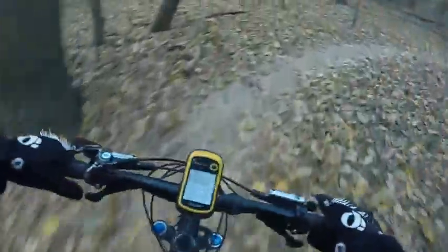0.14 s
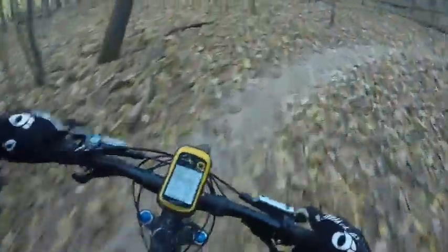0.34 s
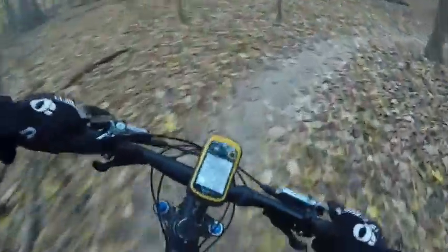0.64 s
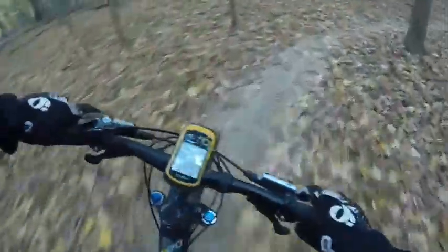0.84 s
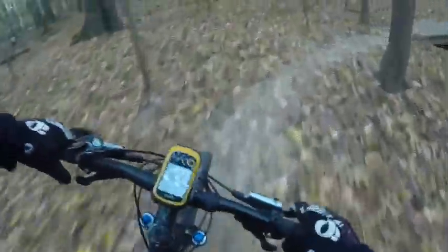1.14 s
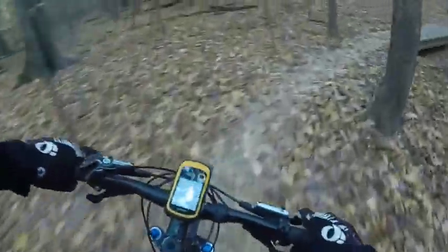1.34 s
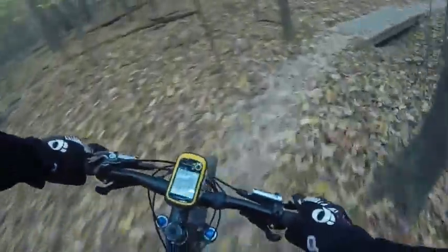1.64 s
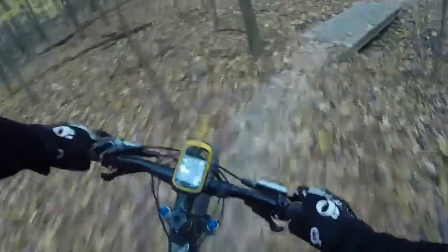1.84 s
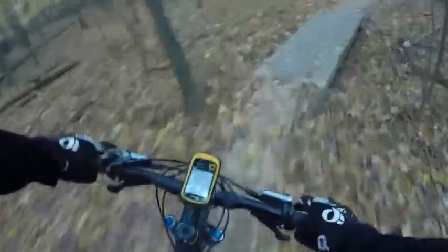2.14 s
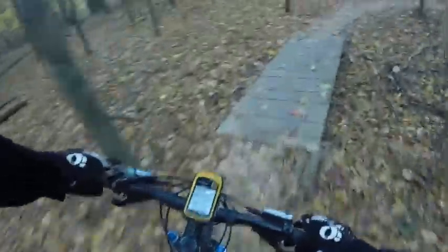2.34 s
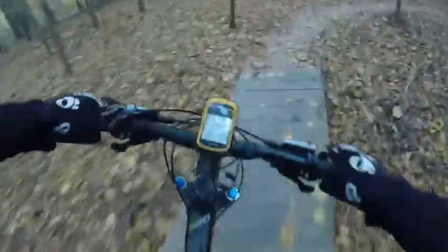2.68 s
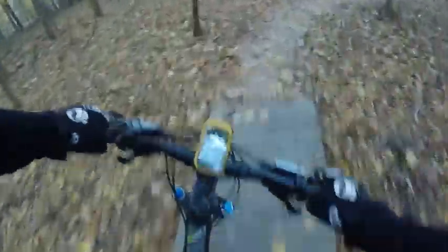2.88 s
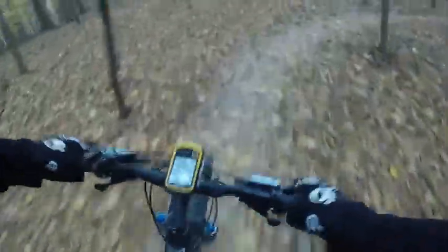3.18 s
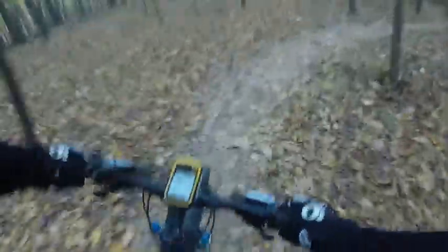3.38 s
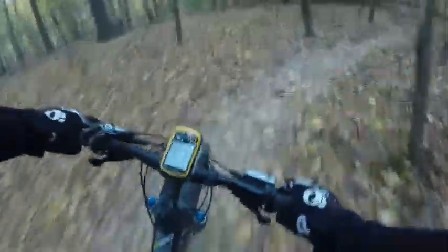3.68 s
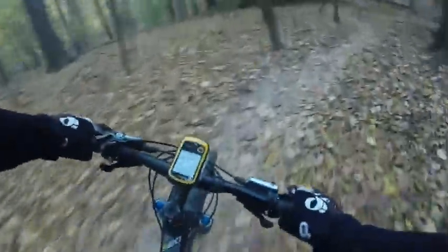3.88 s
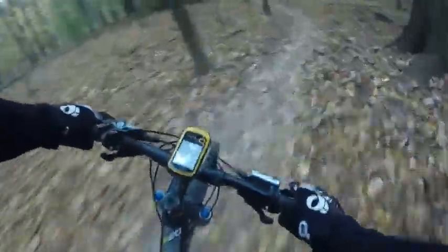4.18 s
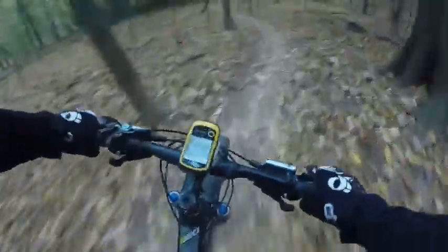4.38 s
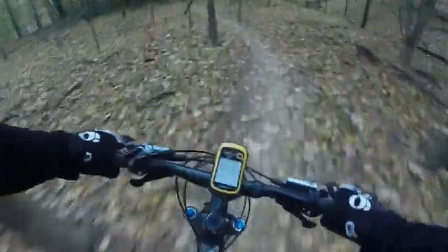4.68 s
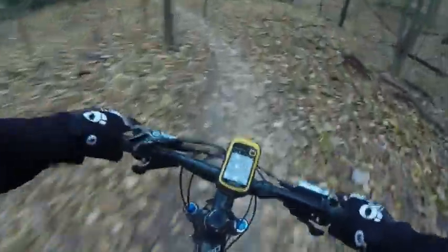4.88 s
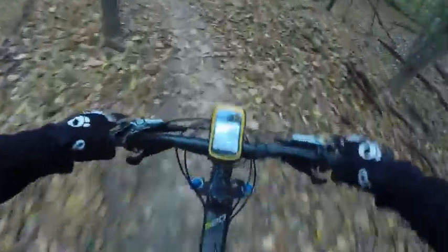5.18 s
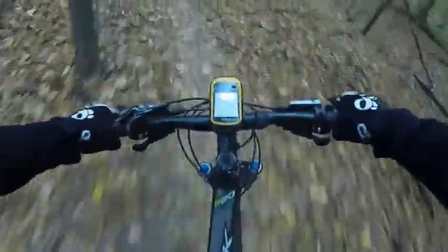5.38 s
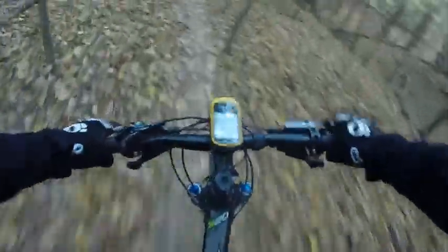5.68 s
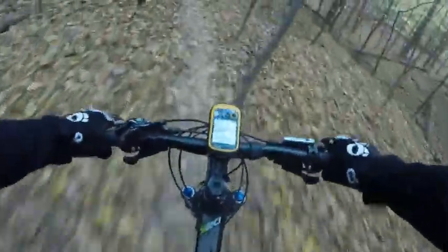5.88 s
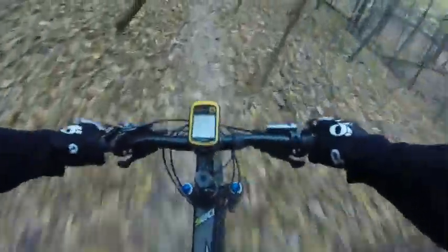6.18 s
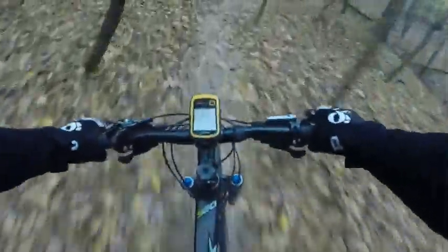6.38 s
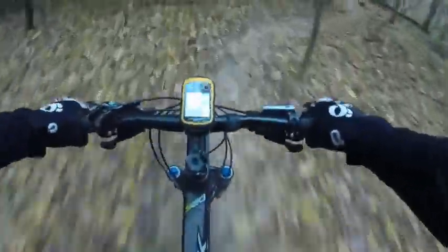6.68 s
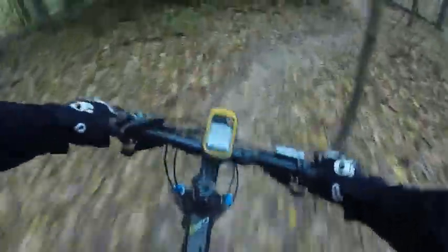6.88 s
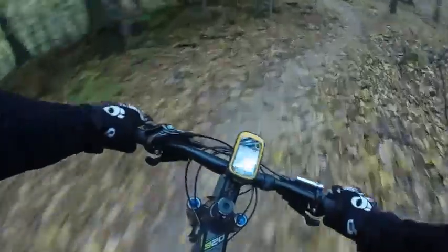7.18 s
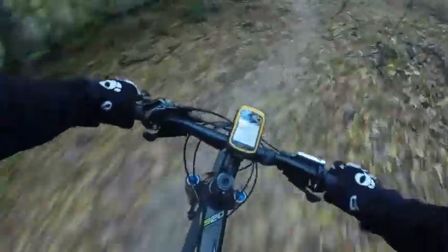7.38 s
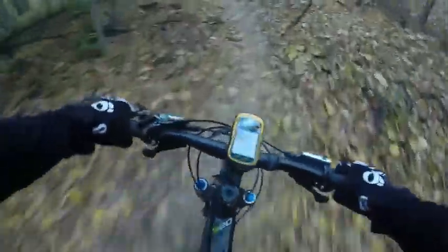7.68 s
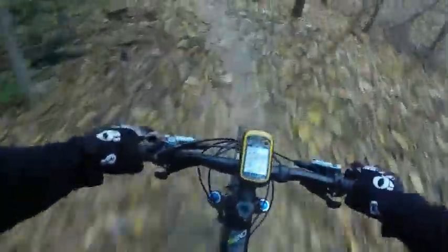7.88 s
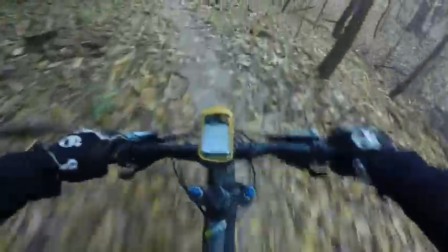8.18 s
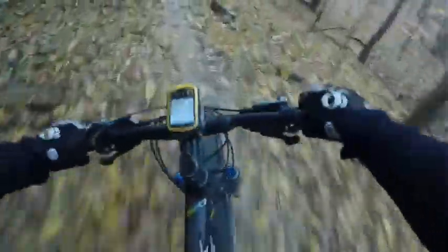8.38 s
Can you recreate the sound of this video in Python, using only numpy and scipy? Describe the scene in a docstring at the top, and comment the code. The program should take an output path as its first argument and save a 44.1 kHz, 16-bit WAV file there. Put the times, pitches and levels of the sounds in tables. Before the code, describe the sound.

A mountain bike rolls over dry leaves for about eight and a half seconds, heard close from the rider's camera, without echo. Gusty wind rumble, low tyre noise and a soft leafy swish run throughout. In the first half second, clothing scrapes the camera housing, with one sharp tap and a faint ping. A knock and leaf crunch come at 1.3 seconds. From 1.5 to 2.6, sharp plastic taps grow louder, each with a tiny skid. At 3 seconds a deep thud lands at the end of a short boardwalk, followed by frame clunks, crunching leaves and hard knocks at 3.4 and 3.6. The rumble briefly drops away, then returns. A loud tap at 4.6 leads into scratchy rubbing until 4.9 and a few bumps around 5. The ride continues with a wind swell near 6.3 and lighter, scattered thuds and clunks to the end.

```python
"""Mountain bike on a forest trail

A bike runs fast over dry leaves and a short boardwalk, heard from a camera worn by the rider.
Rough ground drives the tyres into a rumble, leaves fracture, and bumps and hard landings excite the
damped modes of tyre and frame. Clothing or a strap taps and scrapes on the resonant camera housing,
while turbulent wind buffets the microphone."""
import sys
import numpy as np
from scipy import signal
from scipy.fft import rfft, irfft, next_fast_len
from scipy.io import wavfile

SR = 44100
rng = np.random.default_rng(int(sys.argv[2]) if len(sys.argv) > 2 else 0)


def digitize_waveform(pressure):
    """Quantize a signal to 16-bit integers and store it at the path in sys.argv[1].

    Rows of a 2-D input are taken as channels; values are limited to [-1, 1].
    """
    field = np.atleast_2d(pressure).T
    bounded = np.clip(field, -1, 1)
    quanta = np.round(bounded * 32767).astype(np.int16)
    wavfile.write(sys.argv[1], SR, quanta)


N = 376173
TIME = np.arange(N) / SR

# The ride, louder with speed and rough ground: t/s, wind level/dB, rumble level/dB, leaf level/dB
RIDE_LEVELS = [(0.0, -47, -47.5, -47.5), (0.3, -40.5, -49, -50), (0.85, -38.5, -39.5, -50.5),
               (1.15, -40.5, -46, -49.5), (2.05, -29.5, -37, -48.5), (2.5, -36.5, -47.5, -50.5),
               (2.95, -31.5, -38.5, -48), (3.5, -32.5, -38, -47), (4.1, -44.5, -46, -51),
               (4.95, -35.5, -47.5, -48.5), (5.2, -37, -41.5, -51.5), (5.5, -38, -42.5, -48),
               (6.0, -34.5, -46, -52.5), (6.3, -27.5, -41.5, -47), (6.6, -35, -46, -52.5),
               (6.9, -31.5, -39.5, -48), (7.9, -37.5, -43.5, -49), (8.53, -32.5, -37.5, -45.5)]
# Bumps in the trail: t/s, thud level/dB, relative clunk level/dB
BUMPS = [(0.438, -27.5, -13), (1.122, -22, -16), (1.348, -27, -6.5), (2.169, -23, -10), (2.666, -23, -11.5),
         (2.983, -23.5, -2), (3.007, -9.5, -25), (3.1, -26, -1), (3.283, -28.5, 0), (3.34, -18, -1.5),
         (3.362, -21, -10), (3.422, -21.5, -3.5), (3.472, -29.5, -3.5), (4.876, -30.5, -1),
         (4.978, -27.5, -23), (5.031, -23.5, -4), (5.907, -29, -5), (6.631, -32, -9), (6.991, -28.5, -13),
         (7.085, -26, -11.5), (7.222, -27.5, -9), (7.655, -25, -9), (8.156, -28, -5), (8.395, -31, -8)]
# Hard landings: t/s, level/dB, frequency ratio, thump level/dB
KNOCKS = [(1.347, -16.5, 0.87, -28.5), (3.0024, -16, 0.95, -40), (3.3626, -13.5, 1.04, -7),
          (3.6373, -10, 1.11, -12.5)]
# Heaps of leaves under the tyres: t/s, level/dB
CRUNCHES = [(0.85, -39.5), (1.348, -32.5), (3.13, -46), (3.27, -45), (3.325, -35.5), (3.55, -33.5),
            (4.98, -44), (8.40, -50)]
# Taps, each ending in a skid: t/s, level/dB, brightness/dB, relative crack/dB, skid length/s, skid/dB
TAPS = [(0.2414, -8, 13.5, -24, 0.0083, -48), (0.551, -30.5, -1.5, 7, 0.0021, -36),
        (1.546, -22.5, 6, -9, 0.0061, -40.5), (1.7208, -18.5, -1.5, -28, 0.0023, -32),
        (1.768, -20.5, -2, -4, .005, -45), (1.842, -31, -5, -14, 0.0056, -31),
        (1.942, -13, 8.5, -32, 0.0046, -24), (2.096, -5.5, 4.5, -22, 0.03, -19.5),
        (2.209, -6, 7, -9.5, 0.012, -23.5), (2.2462, -4.5, 0, -29, 0.0041, -17.5),
        (2.406, -1, 1.5, -6.5, 0.0069, -26), (2.5465, -7.5, 3, -7, 0.032, -23),
        (3.6864, -16, 9.5, -8, .003, -37), (3.695, -21.5, 5, -2.5, 0.0022, -61),
        (4.6061, -1, -3.5, -9.5, 0.013, -23.5), (5.056, -36, 12, -21, 0.0025, -58),
        (8.507, -38, 9, 2.5, 0.023, -47)]
# Scrapes on the housing: start t/s, length/s, final level/dB, swell/dB, brightness/dB, sizzle/dB
SCRAPES = [(0.0, 0.036, -22.5, -3, -7, -3), (0.047, 0.043, -41, -5.5, -39, -10),
           (.12, .012, -46, -1.5, -6, -16), (0.186, .04, -21.5, 5, -9, -5.5),
           (.282, 0.0065, -48.5, -2, 9.5, -14), (0.373, .034, -40.5, -2, 12.5, -19),
           (0.416, 0.014, -26.5, 16, 10.5, -4), (1.56, 0.067, -50, -4, 7, -8.5),
           (1.742, 0.047, -43.5, 2.5, 5.5, -7.5), (2.253, 0.02, -32, -2.5, -5, -7),
           (2.614, 0.011, -32, 0.5, -1.5, -3), (4.655, 0.017, -32, 1, -17.5, 6),
           (4.684, 0.07, -21, 6.5, -16, 3.5), (4.786, 0.04, -26.5, 0.5, -16, 0),
           (4.835, 0.033, -21, 1.5, -6.5, 4.5), (4.876, 0.012, -29.5, 2, 4, -11),
           (4.903, 0.03, -23, -0.5, 4, -11), (8.453, 0.0072, -47.5, -3.5, 6.5, -3)]

# Damped modes: f/Hz, level/dB, T60/s
TYRE_MODES = [(119.8, 5, 0.11), (163, 2.5, 0.098)]
FRAME_MODES = [(290, -30, 0.042), (447, 5.5, 0.091), (455, 2, 0.045), (594, -5.5, 0.069)]
KNOCK_MODES = [(478, -4, 0.015), (820, -5, 0.0032), (1200, -0.5, 0.0044), (1874, -12, 0.012),
               (2020, 6, 0.012), (2560, 3.5, 0.012), (4130, -46, 0.0084)]
# Resonances of the housing's shell and of its cavity: f/Hz, bandwidth/Hz, level/dB
SHELL_MODES = [(1344, 24, -3), (1550, 160, -7.5), (2368, 48, 0.5), (2558, 61, -3.5), (3014, 87, -1.5),
               (3350, 87, -5), (3550, 79, 1.5), (4420, 110, 0.5), (4630, 390, -11.5), (5370, 64, -15),
               (5790, 84, -2.5), (6180, 120, -12), (6560, 110, -1.5)]
CAVITY_MODES = [(2537, 93, -5.5), (3560, 52, -1.5), (4260, 68, -9)]
# Spectral densities of the noise sources: f/Hz, relative level/dB
TYRE_SPECTRUM = [(40, -6.5), (65, -6.5), (95, -3.5), (120, 1), (145, -3.5), (175, -7.5), (220, -13.5),
                 (320, -34), (600, -83)]
GRIT_SPECTRUM = [(150, 0), (250, 2), (345, -1), (415, 4), (540, -11.5), (700, -7.5), (1000, -16.5),
                 (1600, -33), (3000, -79)]
CLACK_SPECTRUM = [(1000, -17), (1500, -5), (2100, 8), (2600, -11), (3300, -6), (4400, -8), (7000, -38),
                  (14000, -63)]
LEAF_SPECTRUM = [(500, 2), (1000, -3), (1500, 0), (2100, 2), (2500, 1.5), (2900, -1), (3450, -3),
                 (3850, -8), (4400, -6.5), (5150, -18), (6200, -13.5), (6750, -21), (12000, -32.5),
                 (15500, -39)]
FRICTION_SPECTRUM = [(250, -33.5), (700, -5.5), (1000, 2), (1300, 7), (2150, -1), (2600, 2), (3600, 0),
                     (4900, -5), (5500, -3), (6800, -21.5), (7500, -17.5), (9800, -21), (14000, -32.5),
                     (16000, -59)]
WIND_SPECTRUM = [(10, 14.5), (22, 3.5), (35, -11.5), (50, -12), (80, -22), (160, -33), (400, -73)]

SPLIT_HZ, SIZZLE_HZ = 2050, 4900   # crossovers between the low, middle and high bands


def tyres(rumble_db, grit_db):
    """Forced vibration: the air in the tyres booms while knobs and grit patter through the frame."""
    boom = from_db(rumble_db - 1.5) * colour(rng.standard_normal(N), TYRE_SPECTRUM)
    patter_gain = from_db(grit_db - 0.4 + 2.9 * drift(16))
    return boom + patter_gain * colour(grains(per_s=1800, spread_db=2.0), GRIT_SPECTRUM)


def bumps(clunk_offset_db=-6, grit_db=-2, clack_db=-10):
    """Impulse response: a root or plank edge makes the tyre thud and the frame clunk and clack."""
    times, db, clunk_db = np.transpose(BUMPS)
    thud = sum(ring(clicks(times, db + level - 3.0), hz, t60) for hz, level, t60 in TYRE_MODES)
    frame_db = db + clunk_db
    scatter_db = rng.uniform(-3, 3, (len(times), len(FRAME_MODES)))
    clunk = np.zeros(N)
    for k, (hz, level, t60) in enumerate(FRAME_MODES):
        hits = clicks(times, frame_db + level + clunk_offset_db + scatter_db[:, k])
        clunk += (-1) ** k * ring(hits, hz, t60)
    # the soft tyre lets the shaking build up over some milliseconds
    shake = cut(decay(clicks(times, frame_db), t60=0.079), 47, "low", order=1)
    grit = from_db(grit_db) * colour(rng.standard_normal(N), GRIT_SPECTRUM)
    clack = from_db(clack_db) * colour(grains(per_s=850, spread_db=-4.5), CLACK_SPECTRUM)
    return cut(thud, 540, "low") + clunk + shake * (grit + clack)


def knocks(thump_hz=62, thump_t60=0.067):
    """Impact excitation: a hard landing gives a dull clack of heavily damped modes and a deep thump."""
    out = np.zeros(N)
    for start, db, ratio, thump_db in KNOCKS:
        hit = clicks(start, db)
        for k, (hz, level, t60) in enumerate(KNOCK_MODES):
            out += (-1) ** k * from_db(level) * ring(hit, hz * ratio, t60)
        noise = cut(rng.standard_normal(N), 2180, "low", order=4)
        noise = rms_one(cut(noise, 470, "high", order=1))
        out += from_db(4) * decay(hit, t60=0.021) * noise
        out += ring(clicks(start, thump_db), thump_hz, thump_t60)
    return cut(out, 3400, "low")


def leaves(level_db, sizzle_db, flutter_db=1.5):
    """Superposition: countless leaves merge into a swish under the tyres, while single dry ones snap."""
    swish = from_db(-1) * colour(rng.standard_normal(N), LEAF_SPECTRUM)
    snaps = crackle(per_s=130 * from_db(3 * drift(6.6)), spread_db=6.0)
    rustle = swish + from_db(-6.5) * colour(snaps, LEAF_SPECTRUM)
    low = rms_one(cut(rustle, SIZZLE_HZ, "low", order=8))
    high = rms_one(cut(rustle, SIZZLE_HZ, "high", order=8))
    sizzle = from_db(sizzle_db + drift(33)) * high
    return from_db(level_db - 2.6 + flutter_db * drift(17.5)) * (low + sizzle)


def crackle(per_s, spread_db, bands=12):
    """Brittle fracture: each leaf snaps and rings for a few cycles; per_s is the rate in each band."""
    pitches = np.geomspace(1100, 13000, bands)
    return sum(rms_one(resonate(grains(per_s, spread_db), hz, hz / 4)) * np.sqrt(hz) for hz in pitches)


def crunches(bright_db=2, rise_s=0.0029, t60=0.11):
    """Mass fracture: the tyres plough into a heap of leaves, and a dense burst of snaps dies away."""
    times, db = np.transpose(CRUNCHES)
    push = cut(decay(clicks(times, db), t60), 1 / (2 * np.pi * rise_s), "low", order=1)
    snaps = colour(grains(per_s=3000, spread_db=3.5), LEAF_SPECTRUM)
    return push * rms_one(snaps + from_db(bright_db) * cut(snaps, SIZZLE_HZ, "high"))


def cavity(x):
    """Cavity resonance: the hollow housing lifts a few narrow bands."""
    return x + sum(from_db(db) * resonate(x, hz, width) for hz, width, db in CAVITY_MODES)


def taps(damping=2.85, flex_db=-1):
    """Shell vibration: a tap flexes, cracks and rings the housing; harder ones reach its upper modes."""
    times, db, bright_db, crack_db, _, _ = np.transpose(TAPS)
    soft, hard = clicks(times, db), clicks(times, db + bright_db - 5.5)
    flex = from_db(flex_db) * (ring(soft, 1570, t60=0.0081) - ring(hard, 2480, t60=0.0073))
    modes = np.zeros(N)
    for k, (hz, width, level) in enumerate(SHELL_MODES):
        t60 = np.log(1000) / (np.pi * width * damping)
        modes += (-1) ** k * from_db(level - 3.5) * ring(hard if hz > SPLIT_HZ else soft, hz, t60)
    shell = cut(cut(flex + modes, 1230, "high"), 4000, "low", order=1)
    noise = cut(cut(rng.standard_normal(N), 2200, "high"), 6830, "low", order=3)
    crack = decay(clicks(times, db + bright_db + crack_db + 4.0), t60=0.0049) * noise
    return shell + crack


def scrapes(ring_db=8, squeak_db=-6, dull_hz=1375, bright_hz=2600, glide=0.0807, judder_db=2.28,
            drone_hz=590, drone_db=-11, rasp_hz=6600, rasp_db=3):
    """Stick-slip friction: fabric drives the housing; a quicker stroke excites the upper modes more."""
    slips = colour(grains(per_s=14000, spread_db=1.0), FRICTION_SPECTRUM)
    modes = sum(from_db(level + ring_db) * resonate(slips, hz, width) for hz, width, level in SHELL_MODES)
    shell = rms_one(slips + modes)
    out = np.zeros(N)
    for start, length, rise, fall, first_db, last_db, bright_db, sizzle_db in strokes():
        end = start + length
        near = np.flatnonzero((TIME > start - 3 * rise) & (TIME < end + 3 * fall))
        t = TIME[near]
        # pressure drops 20 dB per rise time before the stroke and per fall time after it
        outside = np.maximum((start - t) / rise, (t - end) / fall).clip(0)
        pressure = from_db(np.interp(t, [start, end], [first_db, last_db]) - 20 * outside)
        # the squeak sits on one resonance and goes up in pitch with pressure
        quick = bright_db > 8.5
        pitch = (bright_hz if quick else dull_hz) * (1 + glide * (pressure / pressure.max() - .8))
        stroke = shell[near] + from_db(squeak_db + .04 * max(bright_db, 0) ** 2) * squeak(pitch)
        body = rms_one(cut(cut(stroke, SPLIT_HZ, "low", order=6), 960, "high", order=4))
        edge = rms_one(cut(cut(stroke, SPLIT_HZ, "high", order=6), SIZZLE_HZ, "low", order=8))
        rasp = from_db(rasp_db) * resonate(stroke, rasp_hz, width=700)
        top = cut(stroke + rasp, SIZZLE_HZ, "high", order=8)
        # the housing passes little above 7 kHz, except on the quickest strokes
        leak = from_db(0.59 * bright_db - 5.0) * cut(top, 6270, "high", order=8)
        sizzle = rms_one(cut(top, 6830, "low", order=16) + leak)
        if quick:   # the whole shell drones as well
            body = body + from_db(drone_db) * squeak(np.full(len(t), drone_hz))
        out[near] += pressure * (body + from_db(bright_db) * (edge + from_db(sizzle_db) * sizzle))
    return out * from_db(judder_db * drift(160))


def strokes(rub_rise_s=.014, rub_fall_s=.012, skid_rise_s=0.001456, skid_fall_s=0.0091, skid_fade_db=5):
    """Sliding contacts: rubs come and go gradually; the skid after a tap bites, then loses pressure."""
    rubs = [(start, length, rub_rise_s, rub_fall_s, db - swell_db, db, bright_db, sizzle_db)
            for start, length, db, swell_db, bright_db, sizzle_db in SCRAPES]
    skids = [(start + 2 * skid_rise_s, length, skid_rise_s, skid_fall_s, db, db - skid_fade_db,
              bright_db, -6 - 0.28 * bright_db)   # the duller a skid, the more its sizzle stands out
             for start, _, bright_db, _, length, db in TAPS]
    return rubs + skids


def squeak(hz, width_hz=90):
    """Narrow-band noise: random modulation makes a rough tone that follows a pitch curve; rms 1."""
    waver = cut(rng.standard_normal((2, len(hz))), width_hz / 2, "low")
    phase = 2 * np.pi * np.cumsum(hz) / SR
    return rms_one(waver[0] * np.cos(phase) + waver[1] * np.sin(phase))


def wind(level_db, gust_db=1.0):
    """Turbulent pressure: eddies press slowly on the microphone port."""
    return from_db(level_db + gust_db * drift(15.7)) * colour(rng.standard_normal(N), WIND_SPECTRUM)


def ping(start_s=.2413, level_db=-36, hz=2950, t60=0.13):
    """Free vibration: a small loose metal part rings once, with the first tap."""
    return ring(clicks(start_s, level_db), hz, t60)


def thin_hiss(hz=5600, width_hz=1100, level_db=-52, peak_s=3.296, spread_s=.13):
    """Band-limited noise: a bright hiss swells and fades once under a Gaussian envelope."""
    band = resonate(grains(per_s=9300, spread_db=3.5), hz, width_hz)
    band = rms_one(resonate(band, hz, width_hz))
    return from_db(level_db) * band * np.exp(-((TIME - peak_s) / spread_s) ** 2)


def lull(depth_db, return_s, start_s=3.68, fall_s=0.1):
    """Attenuation curve in dB: after the last hard knock the level falls quickly and climbs back."""
    return np.interp(TIME, np.cumsum([start_s, fall_s, return_s]), [0, -depth_db, 0])


def grains(per_s, spread_db):
    """Poisson process: tiny impulses of random time, sign and size; rms 1."""
    sizes = from_db(spread_db * np.minimum(rng.exponential(1, N), 5)) * rng.choice([-1, 1], N)
    return rms_one(sizes * (rng.random(N) < per_s / SR))


def drift(corner_hz):
    """Random fluctuation: low-passed noise with an rms of about 1."""
    step, settle = 40, 2000   # samples per point, points for the filter to settle
    r = np.exp(-2 * np.pi * corner_hz * step / SR)
    slow = signal.lfilter([1], [1, -2 * r, r * r], rng.standard_normal(N // step + settle + 2))[settle:]
    return np.interp(np.arange(N) / step, np.arange(len(slow)), rms_one(slow))


def clicks(times, db):
    """Impulse train: one click at each time."""
    out = np.zeros(N)
    out[np.clip(np.round(times * SR).astype(int), 0, N - 1)] = from_db(db)
    return out


def decay(hits, t60):
    """Exponential decay: an envelope that jumps at each click and falls 60 dB in t60 seconds."""
    return signal.lfilter([1], [1, -np.exp(-np.log(1000) / (t60 * SR))], hits + 1e-18)


def ring(x, hz, t60):
    """Damped oscillator: a unit click starts a decaying sine of amplitude 1."""
    r, w = np.exp(-np.log(1000) / (t60 * SR)), 2 * np.pi * hz / SR
    return signal.lfilter([0, np.sin(w)], [1, -2 * r * np.cos(w), r * r], x + 1e-18)


def resonate(x, hz, width):
    """Driven resonance: unit gain at the peak, bandwidth in Hz."""
    r, w = np.exp(-np.pi * width / SR), 2 * np.pi * hz / SR
    return signal.lfilter(np.array([1, 0, -1]) * (1 - r * r) / 2, [1, -2 * r * np.cos(w), r * r], x)


def colour(x, spectrum):
    """Spectral shaping: weight a steady sound by a spectrum, rolled off below its first point; rms 1."""
    hz, db = np.transpose(spectrum)
    size = next_fast_len(N)
    grid = np.maximum(np.arange(size // 2 + 1) * SR / size, 1)
    gain = from_db(np.interp(np.log(grid), np.log(hz), db)) * np.minimum(grid / hz[0], 1) ** 2
    return rms_one(irfft(rfft(x, size) * gain, size)[:N])


def cut(x, hz, kind, order=2):
    """Maximally flat filter: kind names the side that passes."""
    return signal.sosfilt(signal.butter(order, hz, kind, fs=SR, output="sos"), x + 1e-18)


def in_time(rows):
    """Linear interpolation: each column of a timed table at every sample."""
    times, *columns = np.transpose(rows)
    return [np.interp(TIME, times, column) for column in columns]


def from_db(db):
    """Amplitude ratio of a level in decibels."""
    return 10 ** (np.asarray(db) / 20)


def rms_one(x):
    """Normalisation to rms 1."""
    return x / np.sqrt(np.mean(x ** 2) + 1e-20)


def scene(wind_gain_db=5.0, boom_db=2, patter_db=-11, jolt_db=2.5, swish_db=1, sizzle_db=-10):
    """Direct sound: all sources add close to the microphone, and the open forest returns no echo."""
    wind_db, rumble_db, leaf_db = in_time(RIDE_LEVELS)
    low_lull_db = lull(depth_db=19, return_s=0.18)
    grit_lull_db = lull(depth_db=15, return_s=0.37)
    leaf_lull_db = lull(depth_db=10, return_s=0.84)
    rolling_db = rumble_db + jolt_db * drift(19.4)   # uneven ground jolts the tyres
    rolling = tyres(rolling_db + boom_db + low_lull_db, rolling_db + patter_db + grit_lull_db)
    rustle = leaves(leaf_db + leaf_lull_db + swish_db, sizzle_db) + crunches()
    bike = rolling + cavity(rustle) + thin_hiss() + bumps() + knocks()
    buffeting = wind(wind_db + low_lull_db + wind_gain_db)
    return (bike + buffeting + taps() + ping() + scrapes())[None]


def record(dry):
    """Saturation and band limiting: the tallest peaks flatten at full scale and the top is cut."""
    cutoff_hz = 15300
    limited = dry / (1 + dry ** 8) ** (1 / 8)
    return signal.sosfilt(signal.ellip(10, .1, 90, cutoff_hz, fs=SR, output="sos"), limited)


dry = scene()
out = record(dry)
digitize_waveform(out)
```